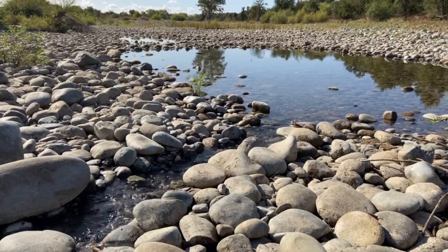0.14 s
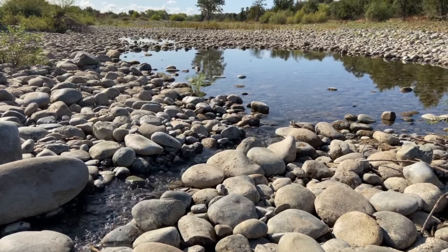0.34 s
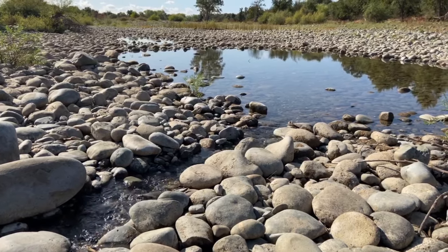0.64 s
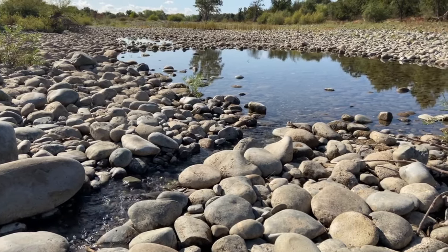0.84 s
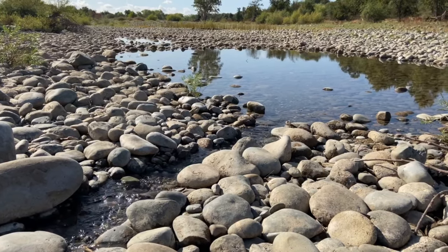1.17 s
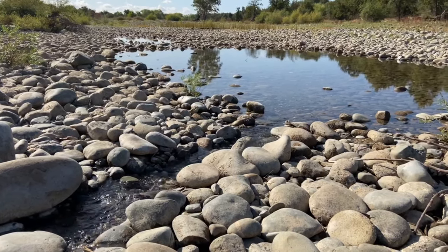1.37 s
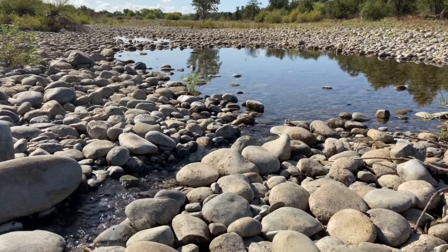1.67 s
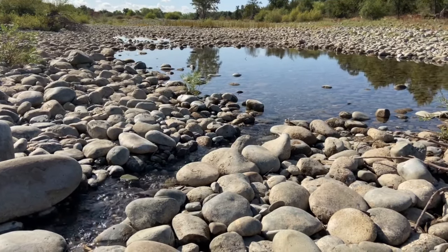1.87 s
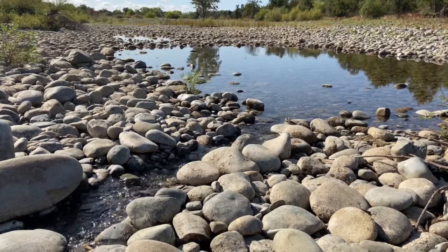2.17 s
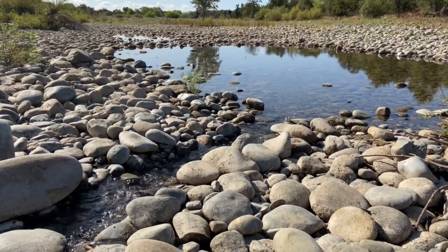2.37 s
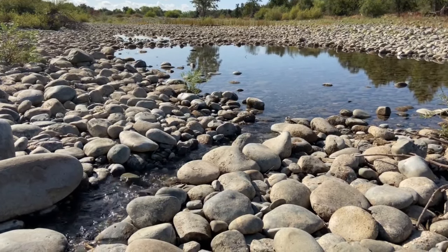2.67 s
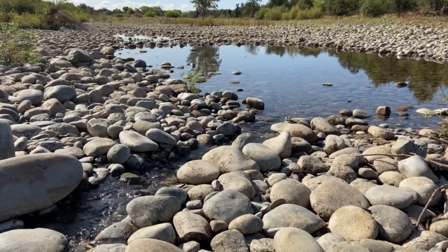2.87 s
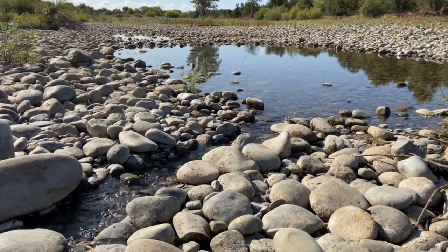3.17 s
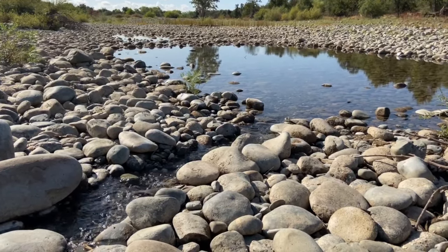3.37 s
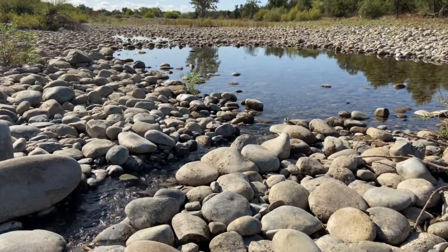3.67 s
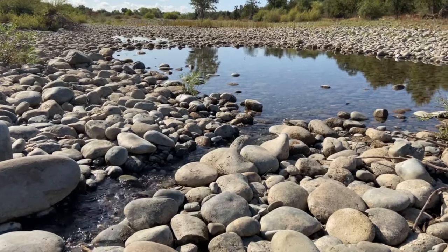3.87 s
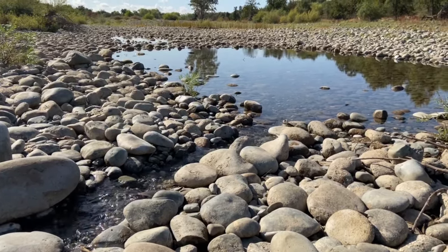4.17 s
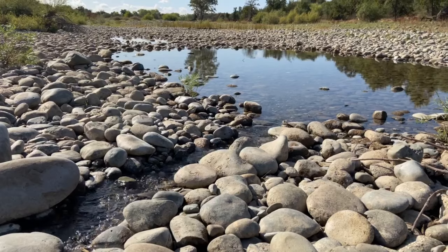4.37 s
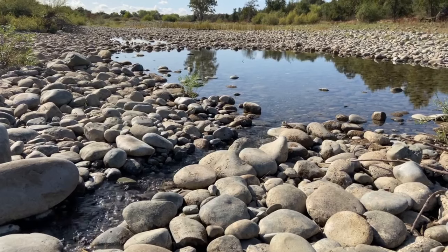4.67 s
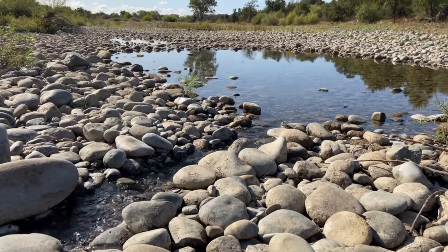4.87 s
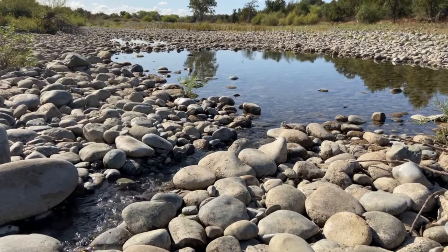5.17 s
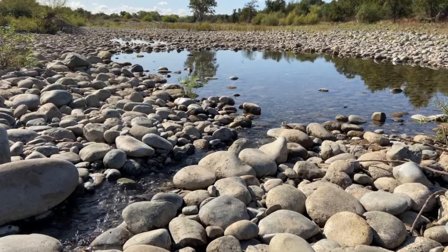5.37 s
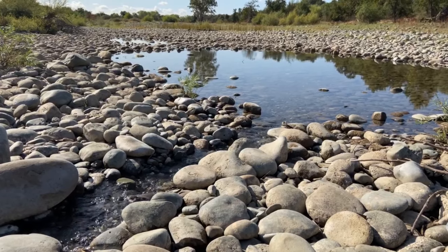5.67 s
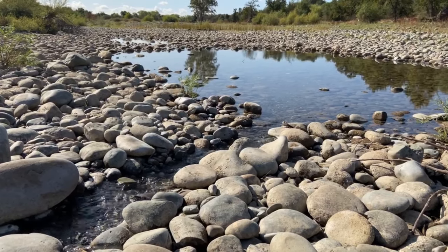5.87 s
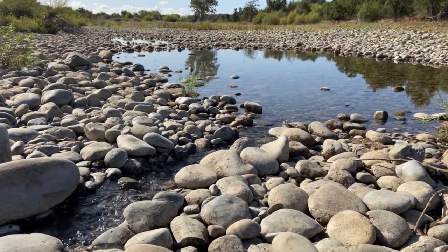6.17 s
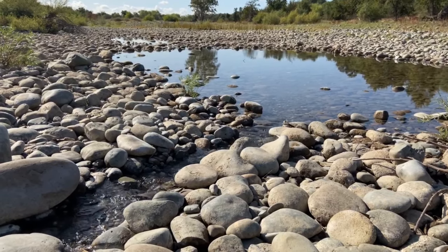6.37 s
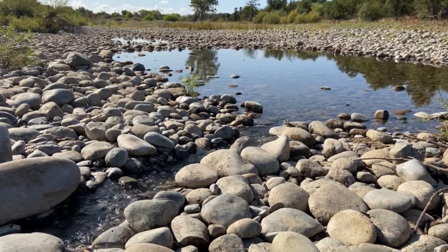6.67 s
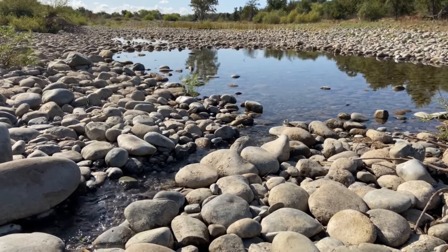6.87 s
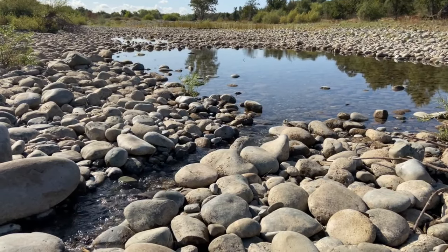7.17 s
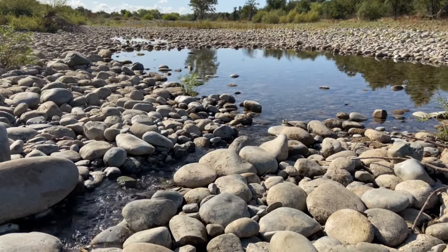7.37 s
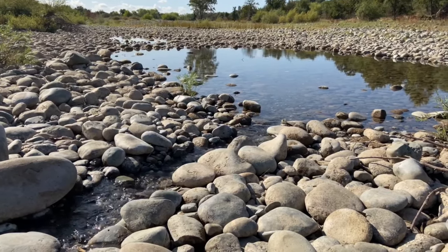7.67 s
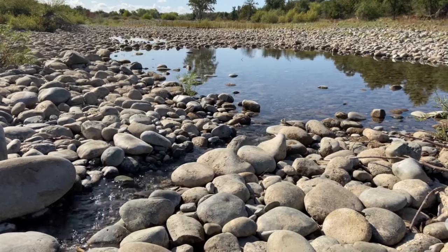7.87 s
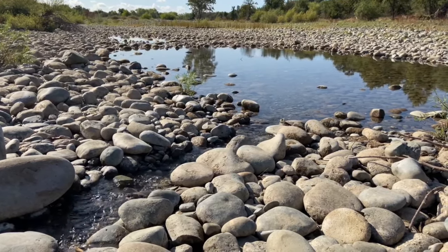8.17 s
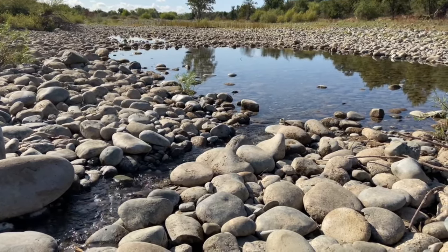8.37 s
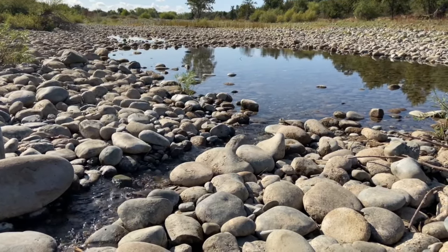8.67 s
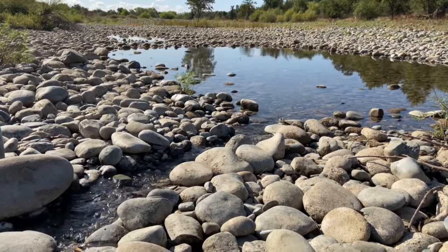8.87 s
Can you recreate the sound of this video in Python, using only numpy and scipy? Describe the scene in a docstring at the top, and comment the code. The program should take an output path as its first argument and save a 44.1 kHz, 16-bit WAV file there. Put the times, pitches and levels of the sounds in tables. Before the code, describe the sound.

A shallow stream trickles over rounded stones, heard very close in stereo outdoors. Throughout the nine seconds, irregular bubbles ring as short, rounded blips, mostly mid-high, some lower and hollow, mixed with tiny high ticks, fizz, crisp spray and a soft broad wash. Stones add only a very short, scattered echo. From 0 to 2 seconds wind buffets the microphone: a deep lumpy rumble with blunt thumps, strong near 0.15 and heaviest around 0.9 to 1.2, then a flurry of weaker knocks. From about 2.2 the wind sinks low and the gurgling stands clear, gently surging around 3.4 and 3.9, with light thumps near 3.1, 4.0 and 4.3 and a deeper one at 5.3. Bright splashing thickens from 6 to 7. At 7.2 to 7.6 a gust swells and hits hard, then fades by 8, leaving mostly bubbling water to the end.

```python
"""Water gurgles, drips and hisses close by, over a low rumble and single thumps of wind.
A shallow stream trickles between rounded stones, near a small two-port microphone in the open.
Air pockets ring as damped sines, droplets are noise puffs with tiny pings, farther riffles are soft noise.
Gusts buffet the ports as shaped low noise, and single eddies thump on them as short, falling tones."""
import sys
import numpy as np
from scipy import signal
from scipy.fft import rfft, irfft, next_fast_len
from scipy.io import wavfile
from scipy.ndimage import uniform_filter1d, map_coordinates

SR = 44100
rng = np.random.default_rng(int(sys.argv[2]) if len(sys.argv) > 2 else 0)


def inscribe(sig):
    """Save sig as 16-bit PCM at rate SR to the path in sys.argv[1].

    A 1-D sig is mono; a 2-D sig holds one channel per row.
    Samples are clipped to [-1, 1] before scaling.
    """
    pcm = np.round(np.clip(np.atleast_2d(sig).T, -1, 1) * 32767)
    wavfile.write(sys.argv[1], SR, pcm.astype(np.int16))


N = 398223

# wind eddies that thump on the ports: (time [s], level before trim [dB], settled pitch [Hz])
EDDIES = [(0.132, -28.5, 86.5), (0.464, -36, 87), (0.982, -23.5, 98.6), (1.129, -25.5, 110),
          (1.174, -33, 124), (1.247, -39.5, 104), (1.293, -29, 132), (1.346, -40, 152), (1.466, -43, 112),
          (1.539, -32.5, 137), (1.639, -36, 102), (1.74, -41, 109), (1.805, -41, 131), (1.86, -35.5, 67.6),
          (1.924, -36.5, 60), (2.012, -43, 89), (2.162, -48, 103), (3.059, -42.5, 112), (3.168, -37, 57.7),
          (4.018, -33.5, 112), (4.306, -39, 113), (5.319, -28.5, 55.7), (7.182, -42, 69),
          (7.494, -23.5, 98), (7.631, -38, 56.4)]


def amp(db):
    """Decibels to a linear gain."""
    return 10 ** (np.asarray(db) / 20)


def unit(x):
    """Scales a signal to rms 1."""
    return x / np.sqrt(np.mean(x ** 2) + 1e-20)


def along(points, hz):
    """Reads a curve of (Hz, value) points on a log frequency axis."""
    f, v = np.transpose(points)
    return np.interp(np.log(hz + 1), np.log(f + 1), v)


def wobble(rate):
    """A smooth random curve with rate knots a second."""
    knots = rng.standard_normal(int(N * 60 / SR))
    return map_coordinates(knots, [np.arange(N) * rate / SR])


def filtered(x, response):
    """Multiplies the spectrum of x by a complex response of frequency."""
    m = next_fast_len(N + SR // 2)
    return irfft(rfft(x, m) * response(np.fft.rfftfreq(m, 1 / SR)), m)[..., :N]


def noise_pair(spectrum, alike, patchy_db):
    """Stereo noise of rms 1 with patches of random gain; alike sets the left-right correlation."""
    z = signal.stft(rng.standard_normal((2, N)), nperseg=256)[2]
    field = uniform_filter1d(rng.standard_normal(z.shape[1:]), size=4, axis=0)
    field = uniform_filter1d(field, size=6, axis=1)
    pair = signal.istft(z * amp(patchy_db * unit(field)), nperseg=256)[1][:, :N]
    turn = np.arccos(np.clip(alike, -1, 1)) / 2
    coloured = filtered(pair, lambda hz: amp(along(spectrum, hz)))
    mid, side = coloured * [[np.cos(turn)], [np.sin(turn)]]
    return unit(np.array([mid + side, mid - side]))


def place(s, shapes):
    """Adds each row of shapes into a track at its start time."""
    at = np.round(s * SR).astype(int)[:, None] + np.arange(shapes.shape[1])
    return np.bincount(at.ravel(), shapes.ravel(), N + SR)[:N]


def ring(s, db, hz, cycles, lag, rise, glide, size, rough=0, burst=0):
    """Damped sines in stereo whose pitch bends late, mostly upward; rough ones warble, bursting ones end early.

    cycles: to fall 60 dB without burst; rise: in cycles; lag: left behind right [s]; size: in samples."""
    chance = rng.random((len(s), 3, 1))
    climb = -glide * (np.log(1 - chance[:, 0]) + .3) * cycles[:, None]
    track = []
    for side in (-.5, .5):
        seconds = np.arange(size) / SR - .0001 + side * lag[:, None]
        n = np.clip(seconds, 0, None) * hz[:, None]  # cycles elapsed
        u = np.minimum(n / cycles[:, None], 2)
        warble = 0
        if rough:
            warble = rough * np.sin(2 * np.pi * (n * (.04 + .12 * chance[:, 1]) + chance[:, 2]))
        decay = amp(-60 * (u + burst * u ** 3))
        shape = decay * (1 - np.exp(-n / rise)) ** 2 * (1 + warble)
        tone = np.sin(2 * np.pi * (n + climb * u ** 3) + warble)
        track.append(place(s, amp(db)[:, None] * shape * tone))
    return np.array(track)


def swarm(count, hz, octaves, spread_db, most_db, clump):
    """Random grains: times, levels that follow clump [dB] up to a ceiling, log-normal pitches, places, lives."""
    u, g = rng.random((count, 2)), rng.standard_normal((count, 3))
    s = u[:, 0] * (N - 1) / SR
    db = np.minimum(-spread_db * np.log(1 - u[:, 1]) + clump[(s * SR).astype(int)], most_db)
    pitch = np.clip(hz * 2 ** (octaves * g[:, 0]), 400, 20000)
    return s, db, pitch, g[:, 1], 2 ** (g[:, 2] / 2)


def bubbles(gurgle_db):
    """A closing air pocket slaps, then rings beside a weaker neighbour; two more follow, small ones fill gaps."""
    # loudest bubbles: (time [s], level before trim [dB], pitch [Hz], decay before scaling [cycles per 60 dB])
    pockets = [(0.028, -56.5, 1067, 49.5), (0.08, -42, 3450, 15), (0.145, -41, 2010, 35),
               (0.146, -52.5, 1230, 99), (0.264, -49, 1940, 46), (0.33, -62, 1910, 60),
               (0.357, -63, 2320, 50), (0.368, -63, 1140, 40), (0.381, -45.5, 2300, 48),
               (0.415, -61, 760, 58), (0.444, -52, 1597, 85), (0.462, -57, 818, 104),
               (0.647, -54.5, 2270, 40), (0.895, -52.5, 695, 59), (0.964, -42, 2340, 66),
               (0.99, -61, 813, 57), (1.071, -53.5, 1930, 51), (1.32, -48.5, 2075, 54),
               (1.478, -56, 1087, 84), (1.623, -58, 1155, 69), (1.759, -48.5, 1960, 37),
               (1.799, -49.5, 1527, 82), (1.817, -42, 3110, 33), (1.826, -47.5, 2260, 32),
               (1.934, -56.5, 837, 68), (1.953, -57.5, 920, 35), (1.959, -48.5, 2010, 35),
               (1.975, -58, 775, 40), (2.009, -52, 1920, 45), (2.013, -50.5, 2350, 47),
               (2.053, -50, 1514, 55), (2.132, -52.5, 1190, 70), (2.165, -58, 1120, 70),
               (2.256, -47.5, 1364, 40), (2.436, -58.5, 1660, 74), (2.485, -59.5, 1230, 81),
               (2.59, -57, 1210, 66), (2.612, -53, 2350, 80), (2.629, -47.5, 1250, 38),
               (2.657, -57, 1185, 48), (2.684, -43, 3400, 29), (2.74, -52, 2500, 84),
               (2.781, -45.5, 3060, 88), (2.798, -51, 2160, 35), (2.843, -48, 2430, 47),
               (2.894, -56.5, 1370, 26), (2.938, -59.5, 1200, 72), (2.998, -48, 2320, 55),
               (2.963, -52, 1690, 55), (3.002, -57, 1015, 121), (3.15, -60, 1990, 63),
               (3.21, -54, 2300, 50), (3.258, -52.5, 965, 70), (3.333, -47.5, 2550, 87),
               (3.358, -55.5, 1220, 50), (3.392, -43, 3160, 43), (3.411, -53.5, 1015, 66),
               (3.46, -46.5, 1227, 51), (3.539, -57, 1540, 68), (3.638, -46.5, 2360, 81),
               (3.821, -56.5, 993, 103), (3.891, -50.5, 1980, 60), (3.95, -55, 1710, 58),
               (3.995, -56, 1030, 70), (4.044, -57, 1405, 58), (4.111, -42, 2550, 42),
               (4.157, -56, 1210, 53), (4.242, -49.5, 1008, 120), (4.368, -46.5, 3160, 38),
               (4.457, -61, 1360, 40), (4.535, -54.5, 2680, 35), (4.565, -48.5, 1774, 109),
               (4.581, -47.5, 1980, 45), (4.607, -57.5, 1400, 70), (4.644, -47.5, 1040, 61),
               (4.728, -47, 1960, 34), (4.729, -56, 1080, 40), (4.815, -54.5, 1930, 40),
               (4.818, -49, 3200, 49), (4.89, -62, 660, 54), (4.968, -48, 2370, 63), (5.03, -44, 3420, 35),
               (5.118, -51, 1580, 98), (5.188, -45, 2050, 45), (5.22, -39.5, 2520, 26),
               (5.259, -56, 1470, 94), (5.348, -54, 742, 49), (5.355, -46.5, 1540, 60),
               (5.367, -49.5, 2330, 30), (5.394, -48.5, 1024, 55), (5.49, -55.5, 1030, 46),
               (5.575, -44.5, 2320, 43), (5.666, -55, 970, 78), (5.711, -46.5, 3520, 40),
               (5.718, -41, 1317, 32), (5.819, -57.5, 1920, 50), (5.906, -58, 1146, 72),
               (5.922, -51, 2030, 61), (5.998, -60, 1000, 64), (6.057, -62, 980, 89),
               (6.071, -47, 2320, 89), (6.113, -53.5, 1157, 122), (6.154, -51.5, 2500, 79),
               (6.467, -51, 2310, 38), (6.47, -55, 1017, 70), (6.496, -47, 1940, 70),
               (6.582, -56.5, 1200, 128), (6.595, -47, 3240, 32), (6.686, -54.5, 1786, 97),
               (6.952, -49, 2310, 42), (6.949, -52.5, 1360, 62), (7.027, -51, 2310, 89),
               (7.043, -49, 2040, 52), (7.247, -45, 2050, 125), (7.299, -57.5, 1206, 48),
               (7.45, -55, 1380, 82), (7.549, -44, 1035, 85), (7.555, -46, 1637, 108),
               (7.574, -44.5, 2470, 35), (7.623, -50, 2130, 51), (7.713, -55.5, 2330, 60),
               (7.728, -56, 1045, 94), (7.762, -53.5, 1520, 85), (7.826, -45.5, 3420, 57),
               (8.025, -59, 1000, 62), (8.04, -53.5, 2350, 88), (8.188, -53, 1500, 53),
               (8.26, -58.5, 1170, 78), (8.353, -43.5, 1209, 91), (8.356, -53.5, 2400, 94),
               (8.408, -56, 1730, 74), (8.489, -50.5, 3000, 32), (8.806, -52.5, 2400, 91),
               (8.832, -60, 1277, 78), (8.98, -43.5, 2620, 54)]
    # pitches that the gaps between stones favour: (frequency [Hz], level [dB])
    hollows = [(400, -9.5), (750, -13.5), (1050, -4), (1600, -4.5), (2250, 4.5), (3200, 6.5), (4200, -1.5),
               (6000, -22)]
    s, db, hz, cycles = np.transpose(pockets)
    chance = rng.standard_normal((len(s), 6))
    main = ring(s, db + 4.5, hz, 1.45 * cycles, 2e-5 * chance[:, 0], rise=.6,
                glide=.04 * hz[:, None] / 1000, size=3000, rough=.12, burst=8)
    beside = ring(s + .004 * abs(chance[:, 1]), db - 6 + 4 * chance[:, 2], hz * (1 + .15 * chance[:, 3]),
                  .4 * cycles, 4e-5 * chance[:, 2], rise=1.5, glide=.2, size=2000, rough=.4, burst=3)

    t = np.arange(400) / SR
    noise = rng.standard_normal((len(s), len(t)))
    slap = place(s, amp(db)[:, None] * amp(-60 * t / .012) * noise)
    # low cut at 1.2 kHz, high cut at 4.5 kHz
    slap = filtered(slap, lambda f: 1 / (1 - 1j * 1200 / (f + 1)) / (1 + 1j * f / 4500) ** 2)

    after = 0
    for k in (1, 3):
        later = s + .012 + .025 * abs(chance[:, k])
        higher = hz * 2 ** (.1 + .4 * chance[:, k + 2])
        after = after + ring(later, db - 8 + 4 * chance[:, k + 1], higher, .5 * cycles,
                             4e-5 * chance[:, k + 1], rise=3, glide=.12, size=2000, rough=.4, burst=3)

    s, db, hz, spot, life = swarm(count=7500, hz=1811, octaves=0.802, spread_db=4.5, most_db=17.0,
                                  clump=gurgle_db + 3.6 * wobble(25))
    small = ring(s, db + along(hollows, hz), hz, 30 * life, 5e-5 * spot, rise=2.1, glide=.12, size=900)
    return main + beside + after + slap + amp(-67.0) * unit(small)


def murmur(gurgle_db):
    """Fainter pockets keep returning to the same few pitches, ringing a little longer and overlapping."""
    # air pockets that form again and again in the same gaps: pitch [Hz]
    pockets_hz = [800, 1015, 1200, 1990, 2320, 4630]
    s, db, scatter, spot, life = swarm(count=900, hz=1000, octaves=.04, spread_db=3, most_db=9,
                                       clump=gurgle_db)
    hz = rng.choice(pockets_hz, len(s)) * scatter / 1000
    rings = ring(s, db, hz, 70 * life, 5e-5 * spot, rise=2.9, glide=0.08, size=2200, rough=0.27, burst=3)
    return amp(-73) * unit(rings)


def droplets(splash):
    """A droplet is a puff of spray plus a tiny, quickly damped bubble; fizz and fine spray follow the splashes."""
    # the loudest droplets: (time [s], level before trim [dB], pitch [Hz])
    ticks = [(0.143, -37, 4700), (0.1464, -24.5, 7770), (0.399, -32.5, 4960), (0.486, -35, 5940),
             (0.575, -36.5, 5030), (0.901, -37, 4770), (0.966, -36.5, 4800), (0.9962, -31, 7000),
             (1.372, -34.5, 5230), (1.4892, -33.5, 5400), (1.6679, -40, 4470), (1.8204, -31.5, 6640),
             (2.759, -37.5, 5900), (2.822, -42, 7600), (3.0183, -45, 7200), (3.906, -37, 4300),
             (3.965, -34.5, 5430), (4.112, -42, 6000), (4.205, -38, 6500), (4.349, -33.5, 6300),
             (4.6626, -30, 6200), (4.765, -36, 7100), (5.4327, -35.5, 5000), (5.922, -34.5, 7000),
             (6.0702, -37, 6060), (6.0923, -32.5, 4630), (6.1526, -37, 4700), (6.206, -34.5, 4640),
             (6.3028, -35, 5800), (6.4962, -30.5, 6200), (6.688, -27.5, 7000), (6.725, -38, 4000),
             (6.928, -37, 6900), (7.0354, -35.5, 5330), (7.291, -40, 4650), (7.376, -36, 8000),
             (7.735, -31, 4670), (8.2204, -43.5, 4450), (8.348, -39, 4470), (8.3987, -38, 4500),
             (8.5866, -38.5, 4750), (8.655, -33.5, 6200), (8.694, -36, 4860), (4.455, -42, 4150)]
    # colour of the spray: (frequency [Hz], level [dB])
    spray_colour = [(800, -29), (2500, -7.5), (5000, 0), (8000, -3.5), (11500, -3), (13000, 0.5),
                    (16500, 0)]
    when, db, hz = np.transpose(ticks)
    t = np.arange(400) / SR
    burst = amp(-60 * t / .008) * (1 - np.exp(-t / .0008))
    puffs = place(when, amp(db - 0.5)[:, None] * burst * rng.standard_normal((len(when), len(t))))
    pings = ring(when, db - 4.0, hz, np.full(len(when), 40.), 1.5e-5 * rng.standard_normal(len(when)),
                 rise=1.5, glide=0.06, size=600, rough=.2)

    s, db, hz, spot, life = swarm(count=9000, hz=5184, octaves=0.446, spread_db=6.5, most_db=24,
                                  clump=3.9 * splash + 2.0 * wobble(9.6))
    fizz = ring(s, db, hz, 30 * life, 4e-5 * spot, rise=3, glide=.12, size=450)

    s, db, hz, _, life = swarm(count=1100, hz=8550, octaves=0.9, spread_db=3.0, most_db=20.0,
                               clump=5.9 * splash)
    u = t / (0.0011 * life[:, None])  # spray swells and fades within a few milliseconds
    slow_noise = uniform_filter1d(rng.standard_normal(u.shape), size=12, axis=1)
    band = slow_noise * np.cos(2 * np.pi * hz[:, None] * t)  # each grain has its own band
    spray = place(s, amp(db)[:, None] * u * np.exp(-u) * band)

    def colour(f):
        return amp(along(spray_colour, f))

    puffs = filtered(puffs, lambda f: colour(f) / (1 + (f / 9000) ** 4))
    return puffs + pings + amp(-72.5) * unit(fizz) + amp(-68.0) * unit(filtered(spray, colour))


def spatter():
    """Short bright bursts of spray: coloured noise, each with its own decay time."""
    # the brightest bursts of spray: (time [s], level before trim [dB])
    bursts = [(0.038, -37.5), (0.1426, -34), (0.4865, -42), (0.6643, -39), (0.865, -44), (0.9647, -47),
              (0.9951, -44), (1.066, -44), (1.2203, -37), (1.3477, -39.5), (1.3713, -44), (1.538, -42.5),
              (1.6784, -36.5), (1.8192, -28), (1.9828, -40), (2.008, -36.5), (2.2263, -43.5), (2.822, -47),
              (2.9557, -51), (3.0183, -42), (3.3514, -43.5), (3.4715, -52), (3.735, -50), (3.8302, -45),
              (3.9623, -39), (4.1106, -47), (4.2127, -38), (4.35, -45), (4.732, -40), (4.764, -39.5),
              (5.0295, -41), (5.481, -44), (5.6945, -49), (5.8064, -40), (5.9968, -46), (6.0712, -31),
              (6.1657, -35.5), (6.2532, -35.5), (6.301, -45), (6.6837, -54), (6.732, -41), (6.779, -30.5),
              (6.928, -31), (7.244, -37), (7.377, -36.5), (7.7338, -43), (8.2197, -41.5), (8.6934, -34.5),
              (8.9365, -34)]
    # colour of those bursts: (frequency [Hz], level [dB])
    bright = [(4000, -15.5), (7500, -3), (10500, -1), (16500, -1)]
    s, db = np.transpose(bursts)
    t = np.arange(500) / SR
    t60 = 0.0049 * 2 ** (rng.standard_normal((len(s), 1)) / 2)
    shape = amp(-60 * t / t60) * (1 - np.exp(-t / 0.00052))
    noise = shape * rng.standard_normal((len(s), len(t)))
    return filtered(place(s, amp(db + 4)[:, None] * noise), lambda f: amp(along(bright, f)))


def stones(x):
    """Short scattered echoes, different left and right, from 12 noise tails that take turns over time."""
    # scatter among the stones: (frequency [Hz], time to fall 60 dB [s])
    scatter_t60 = [(500, 0.065), (3000, 0.09), (12000, 0.014)]
    count = 12
    hz, t, z = signal.stft(rng.standard_normal((count, 2, SR // 12)), SR, nperseg=128)
    fade = amp(-60 * t / along(scatter_t60, hz)[:, None])
    tails = signal.istft(z * fade, SR, nperseg=128)[1]
    spot = np.arange(N) // 1000 % count  # the next tail every 1000 samples
    echoes = 0
    for k, tail in enumerate(tails):
        tail = tail / np.linalg.norm(tail[0])
        echoes = echoes + signal.oaconvolve(x * (spot == k), tail, axes=1)[:, :N]
    return echoes


def riffles(splash):
    """Water too dense for single grains: a mottled wash, and a mist that follows the splashes, more alike."""
    # noise colours: (frequency [Hz], level [dB per Hz])
    wash_colour = [(250, 8), (450, -4), (1000, -7), (1700, -13), (2400, -12.5), (3500, -14), (5500, -20),
                   (8000, -22)]
    mist_colour = [(5000, -35), (7500, -54), (11000, -26), (16500, -15)]
    wash = amp(-65.0 + 2.54 * wobble(20)) * noise_pair(wash_colour, alike=0.25, patchy_db=1.5)
    mist = amp(-79.5 + 2.0 * splash) * noise_pair(mist_colour, alike=0.78, patchy_db=-11.0)
    return wash + mist


def wind():
    """Turbulence at the ports: lumpy rumble, its upper part less alike left and right, and single eddies."""
    # rumble colours: (frequency [Hz], level [dB per Hz])
    low_colour = [(12, -26), (25, -9), (45, 11), (68, 12.5), (110, 4), (200, -58.5)]
    upper_colour = [(60, -29), (100, -1.5), (170, -2), (240, -12), (450, -24.5), (700, -41), (1200, -76)]
    low_level, upper_level = buffeting()
    rumble = noise_pair(low_colour, alike=0.93, patchy_db=2.0)
    power = uniform_filter1d(np.mean(rumble ** 2, 0), size=2600)
    even = rumble / (power + 0.064) ** 0.15  # softens chance swells, so that the gusts shape the level
    low = low_level * unit(even)
    flicker = amp(2.85 * wobble(25))
    upper = upper_level * unit(flicker * noise_pair(upper_colour, alike=.5, patchy_db=0.5))

    s, db, hz = np.transpose(EDDIES)
    n = np.arange(3000) / SR * hz[:, None]  # cycles elapsed
    swing = np.sin(2 * np.pi * (n + 0.66 * (1 - np.exp(-n / 0.47))))  # the first swing is the fastest
    shape = amp(-60 * n / 7) * (1 - np.exp(-n / 0.44)) ** 2
    thumps = place(s, amp(db + 5.5)[:, None] * shape * swing)
    # an eddy opens with a quicker flutter, at 2.38 times the pitch, falling 60 dB in 12.5 cycles
    flutter = ring(s, db - 5.5, 2.38 * hz, np.full(len(s), 12.5), 0 * s, rise=2.44, glide=0, size=3000)
    lean = amp([[-1.5], [1.5]] * wobble(3.7))  # an eddy favours one port
    return low + upper + (thumps + flutter) * lean


def buffeting():
    """Levels of the low and upper rumble: wind, random lumps, buffets that swell and fade, wakes of eddies."""
    # between the buffets: (time [s], low rumble [dB], upper rumble [dB])
    breeze = [(0.0, -43, -56.5), (0.33, -59, -63.5), (0.55, -52, -59), (0.85, -38, -57.5),
              (1.03, -43, -54.5), (1.18, -48.5, -53.5), (1.48, -56.5, -57.5), (2.13, -51, -58.5),
              (2.69, -61.5, -62.5), (3.07, -51, -62), (3.22, -56, -61), (6.09, -57.5, -59),
              (6.99, -56, -60.5), (7.44, -37, -53.5), (7.77, -57.5, -59), (8.28, -69, -65.5),
              (8.7, -61, -63.5), (9.03, -57.5, -66)]
    # the strongest low buffets: (time of the crest [s], crest level [dB])
    crests = [(0.074, -37), (0.152, -27.5), (0.327, -38), (0.5, -42), (0.599, -45), (0.7, -34), (0.83, -46),
              (0.921, -26.5), (1.15, -30.5), (1.48, -46), (1.66, -42), (2.01, -41.5), (2.34, -42.5),
              (3.541, -47), (4.072, -46.5), (4.799, -40.5), (5.528, -42), (7.171, -43), (7.322, -33),
              (7.438, -40), (7.52, -33)]
    swell_s, fade_s = 0.024, 0.022  # a buffet gains and loses 10 dB in these times
    lumps_per_s, lumps_db = 14, 3  # the weaker buffets come at random
    wake_db, wake_s = -36, 0.035  # wake level against the eddy's, and time to lose 10 dB

    t = np.arange(0, N + 64, 64) / SR
    s, low_db, upper_db = np.transpose(breeze)
    lumps = np.interp(t, np.arange(N) / SR, wobble(lumps_per_s))
    lumpy_db = np.interp(t, s, low_db) + lumps_db * lumps
    steady_db = np.interp(t, s, upper_db)

    s, crest_db = np.transpose(crests)[..., None]
    buffet_db = crest_db - 10 * np.maximum((s - t) / swell_s, (t - s) / fade_s)
    s, peak_db, _ = np.transpose(EDDIES)[..., None]
    wake = (t > s) * amp(2 * (peak_db + wake_db - 10 * abs(t - s) / wake_s))
    # twice the dB gives power, so that the parts add as power
    low = np.sqrt(amp(2 * lumpy_db) + amp(2 * buffet_db).sum(0))
    upper = np.sqrt(amp(2 * steady_db) + wake.sum(0))
    return [np.interp(np.arange(N) / SR, t, level) for level in (low, upper)]


def scene():
    """The water's left-right phase changes with frequency; wind adds to it."""
    # the stream surges and lulls: (time [s], level [dB])
    flow = [(0, -0.5), (.25, 0), (.42, 6), (.56, -3), (.95, 2.5), (1.2, -0.5), (1.8, 0.5), (2.27, -3.5),
            (2.75, 1.5), (3.1, -1.5), (3.38, 3), (3.6, -6), (3.9, 4.5), (4.1, -1.5), (4.42, -0.5),
            (4.75, -2), (5.2, -0.5), (5.5, -0.5), (6.1, 3), (6.4, 1.5), (6.68, 2.5), (7.15, -3.5),
            (7.55, 3), (8, -1), (9.03, 1)]
    # stereo phase of the water: (frequency [Hz], phase by which the left leads [rad])
    lead = [(0, 0), (1500, .9), (2000, .5), (3700, 2.3), (4500, -1.3), (7000, -.2), (7600, -.4),
            (8950, -3.14), (11100, -6.28), (13200, -9.42), (15200, -12.57), (16500, -13)]
    flow_db = np.interp(np.arange(N) / SR, *np.transpose(flow))
    quick = wobble(45)
    splash = quick - uniform_filter1d(quick, size=5000) + flow_db / 8
    near = bubbles(flow_db) + murmur(flow_db) + droplets(splash) + spatter()
    water = near + amp(-9) * stones(near) + amp(flow_db) * riffles(splash)

    def stereo_phase(hz):
        return np.exp(.5j * np.outer([1, -1], np.interp(hz, *np.transpose(lead))))

    return filtered(water, stereo_phase) + wind()


def record(dry):
    """Treble limit of the whole sound: above 15.65 kHz the level falls 1 dB every 17 Hz, for 2 kHz."""
    return filtered(dry, lambda hz: amp(-np.clip(hz - 15650, 0, 2000) / 17))


dry = scene()
out = record(dry)
inscribe(out)
```